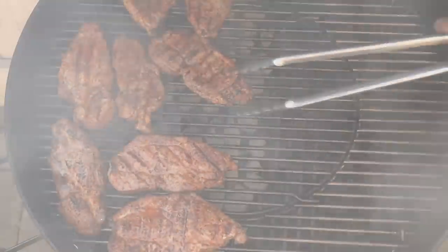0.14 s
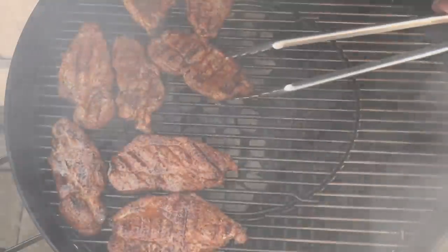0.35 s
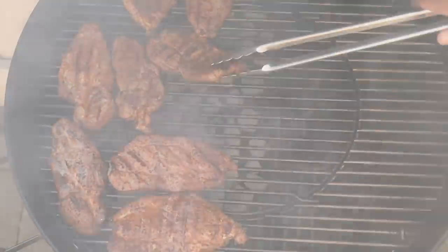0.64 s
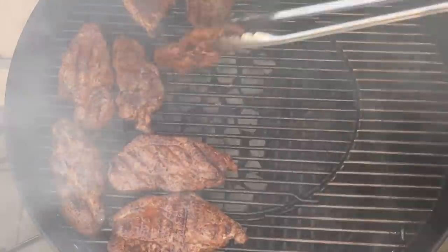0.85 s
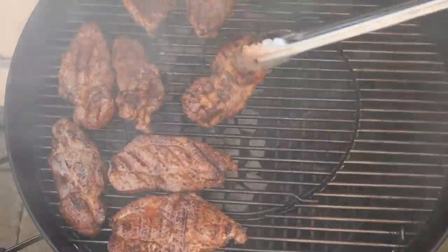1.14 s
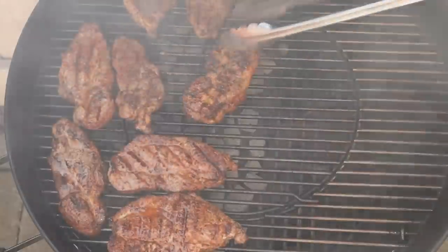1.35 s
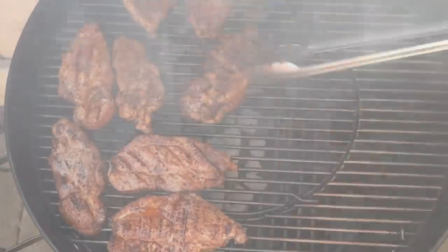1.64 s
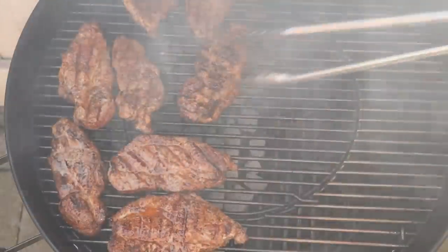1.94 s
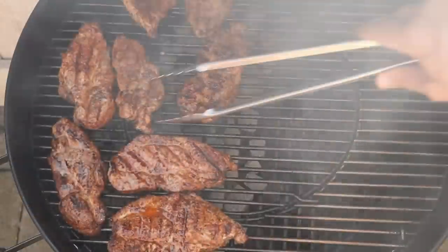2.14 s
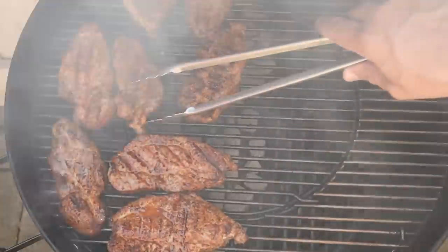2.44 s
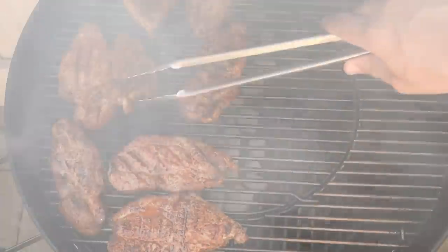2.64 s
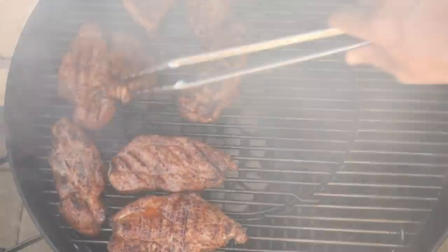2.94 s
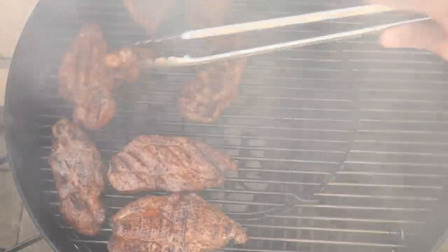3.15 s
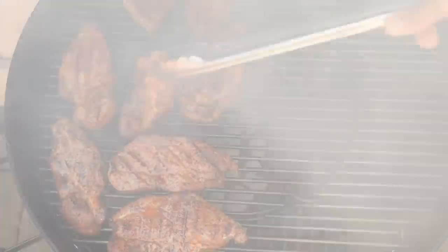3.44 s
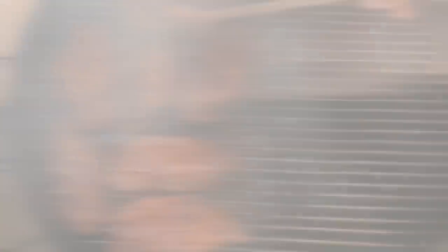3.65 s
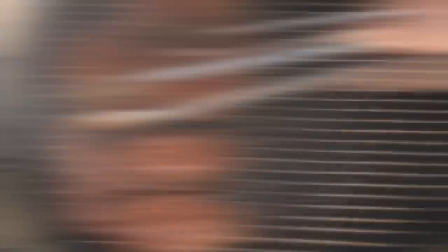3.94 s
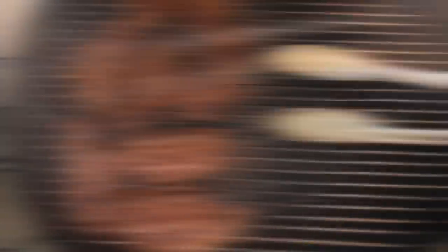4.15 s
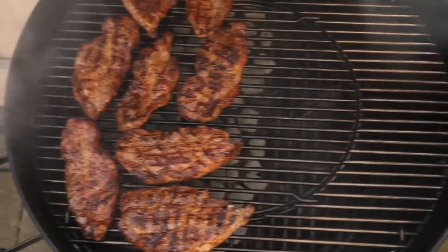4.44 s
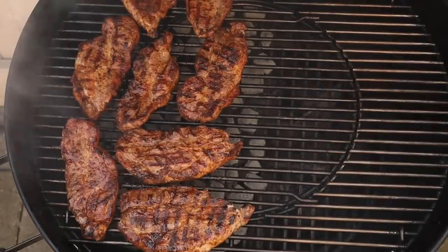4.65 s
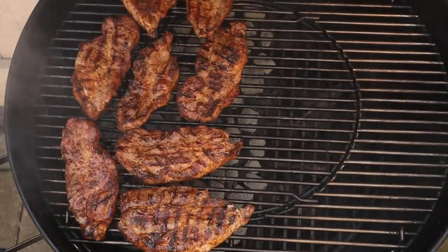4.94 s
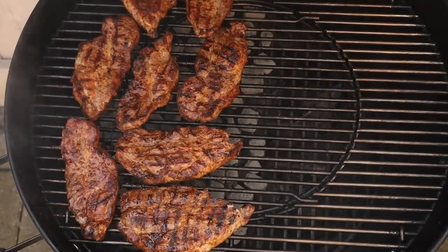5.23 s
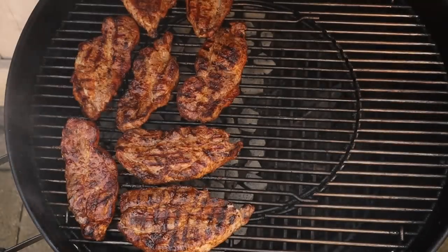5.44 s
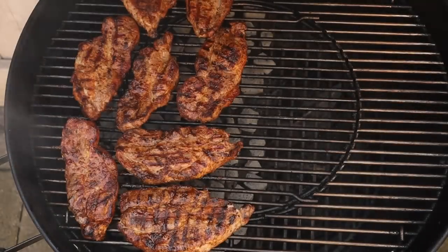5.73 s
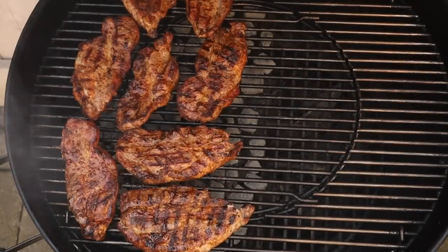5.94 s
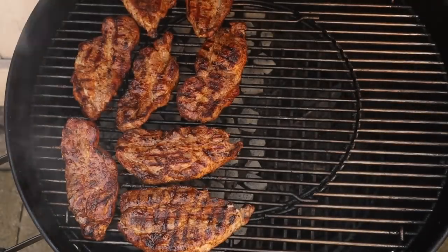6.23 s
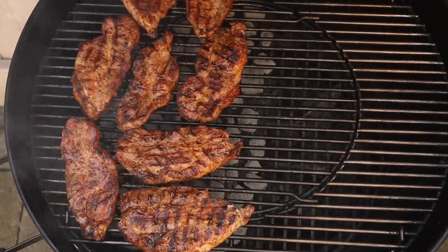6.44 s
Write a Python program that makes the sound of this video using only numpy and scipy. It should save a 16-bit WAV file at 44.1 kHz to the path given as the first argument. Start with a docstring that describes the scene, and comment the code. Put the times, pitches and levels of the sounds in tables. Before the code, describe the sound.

Pork sizzles on a charcoal grill throughout, a bright, dense hiss full of tiny crackles, heard from just above the grate with a faint low outdoor rumble beneath. Tongs softly bump the grate at the very start, and meat rubs faintly on the bars. At about 1.2 seconds juice spits and the sizzle flares, swelling again around 1.8, 2.9 and 3.6 seconds, the last with a sharper spit. Single pops of fat are scattered between 0.6 and 4.3 seconds. At 2.4 seconds the tongs give a short, lightly ringing metal scrape. Around 4 seconds the tone shifts slightly as the microphone moves, and the sizzle slowly eases. At about 5.2 seconds the tongs slide on a wooden board, then land with a few hollow, rattling knocks from 5.35 to 5.8 seconds, the first the loudest. The sizzle continues to the end, around 6.5 seconds.

```python
"""Pork sizzles on a charcoal kettle grill in a quiet garden, heard from just above the grate.
From the start, countless tiny steam bursts echo in the steel bowl; tongs bump the grate and drag meat.
Then the sizzle flares as pieces are turned or pressed and fat hits the coals, fading as the meat dries.
Near 4 s the microphone moves and the tone changes. Last, just after 5 s, the tongs are slid aside
and put down on a wooden board with a few hollow knocks."""
import sys
import numpy as np
from scipy import signal
from scipy.fft import rfft, irfft
from scipy.io import wavfile
from scipy.ndimage import uniform_filter1d

SR = 44100
rng = np.random.default_rng(int(sys.argv[2]) if len(sys.argv) > 2 else 0)


def dump_mix(stems):
    """Bounce the given channels to the path in sys.argv[1] as a 16-bit WAV at rate SR."""
    frames = np.atleast_2d(stems).T  # one column per channel
    limited = np.clip(frames, -1, 1)  # hard clip at full scale
    pcm = np.round(limited * 32767).astype(np.int16)
    wavfile.write(sys.argv[1], SR, pcm)


N = 290619
TIME = np.arange(N) / SR
# the tongs hit the board:
# (time [s], level [dB], extra clack [dB], extra thud [dB], pitch [factor], wait until the bounce [s])
KNOCKS = [(5.353, -19.5, -1.5, -26, 0.96, 0.029), (5.428, -27, 2, -15, 0.93, 0.033),
          (5.633, -25.5, -5.5, -27, 0.98, 0.026), (5.7038, -31.5, -11, -32.5, 0.9, 0.025),
          (5.729, -36.5, 0, -7, 1.2, 0.014), (5.754, -31, -12, -18, 1.02, 0.033)]


def undb(db):
    """Turn decibels into a gain to multiply by."""
    return 10 ** (np.asarray(db) / 20)

def unit(x):
    """Scale x to an average (rms) level of 1."""
    return x / np.sqrt(np.mean(x ** 2))

def steady(x):
    """Keep the average level near 1 over each half second."""
    return x / np.sqrt(uniform_filter1d(x ** 2, size=SR // 2))

def add(out, s, sound):
    """Mix a short sound in at time s."""
    i = int(s * SR)
    out[i:i + len(sound)] += sound[:N - i]

def envelope(s, rise_s, hold_s, decay_s):
    """A level that rises from time s, holds, then dies away."""
    rise = np.clip((TIME - s) / rise_s, 0, 1)
    return rise * np.exp(-np.maximum(TIME - s - rise_s - hold_s, 0) / decay_s)

def swell(s, half_length_s):
    """A smooth rise and fall around time s."""
    return np.exp(-((TIME - s) / half_length_s) ** 2)

def freqs(x):
    """The frequencies in the spectrum of x, in Hz."""
    return np.maximum(np.fft.rfftfreq(len(x), 1 / SR), 1)

def colour(x, points):
    """Shape the tone of x along (frequency [Hz], level [dB]) points."""
    hz, db = np.transpose(points)
    gain = undb(np.interp(np.log(freqs(x)), np.log(hz), db))
    return irfft(rfft(x) * gain, len(x))

def below(x, hz):
    """The part of x lower than hz."""
    return irfft(rfft(x) / (1 + (freqs(x) / hz) ** 6), len(x))

def resonate(x, hz, width_hz):
    """Let x ring around one pitch; a narrow width rings longer."""
    hz = min(hz, SR / 3)
    return signal.lfilter(*signal.iirpeak(hz, hz / width_hz, fs=SR), x)

def band(x, hz, width_hz):
    """The part of x close to hz, at level 1."""
    return unit(resonate(resonate(x, hz, width_hz), hz, width_hz))

def bands(x, rows):
    """Mix several bands of x, each at its own level."""
    return sum(undb(db) * band(x, hz, width_hz) for hz, width_hz, db in rows)

def cavity(x, rows):
    """The air in a hollow rings along with x at its own pitches."""
    return sum(undb(db) * resonate(x, hz, width_hz) for hz, width_hz, db in rows)

def echo(x, delay_ms, dull_hz):
    """Sound bounces off a curved wall, which scatters the treble."""
    f = freqs(x)
    return irfft(rfft(x) * np.exp(-2j * np.pi * f * delay_ms / 1000 - (f / dull_hz) ** 2), len(x))

def wander(per_s):
    """A smooth random drift, about 1 in size."""
    step = int(SR / per_s)
    stairs = np.repeat(rng.standard_normal(N // step + 1), step)
    return unit(uniform_filter1d(uniform_filter1d(stairs, step), step))[:N]

def grains(per_s, spread_db):
    """Tiny random clicks, most weak and a few strong."""
    size = undb(spread_db * np.minimum(rng.exponential(size=N), 6))
    return unit((rng.random(N) < per_s / SR) * size * rng.choice([-1, 1], N))

def garden():
    """Low outdoor rumble with a wavering distant drone in it."""
    # tone of the rumble: (frequency [Hz], level [dB])
    rumble_tone = [(20, -28), (50, -14), (68, -2), (90, -2), (130, -2.5), (190, -9), (400, -16),
                   (1500, -44)]
    # its slow rise and fall: (time [s], relative level [dB])
    rumble_level = [(0, -60), (.7, -63), (2.4, -65.5), (3.4, -61), (4, -61), (4.3, -66), (6.55, -64)]
    db = np.interp(TIME, *np.transpose(rumble_level))
    drone = undb(-7.5) * band(rng.standard_normal(N), hz=70.4, width_hz=7.7)
    rumble = unit(colour(rng.standard_normal(N), rumble_tone))
    return (rumble + drone) * undb(db - 1.5 + 0.4 * wander(per_s=5))

def grate_nudges():
    """A light bump of the tongs and meat rubbing on the grate make the bowl hum briefly."""
    # what rings after the bump: (pitch [Hz], width [Hz], level [dB])
    bump_ring = [(576, 90, 0), (745, 150, -7)]
    # the bowl's hum under the rubbing: (pitch [Hz], width [Hz], level [dB])
    rub_hum = [(235, 126, -0.5), (800, 71, -5)]
    # meat is dragged: (time [s], level [dB], half length [s])
    rubs = [(0.254, -58.5, 0.16), (1.15, -59, 0.15)]
    bump = undb(-50) * bands(rng.standard_normal(N), bump_ring)
    bump *= envelope(0.082, rise_s=0.015, hold_s=0.022, decay_s=0.028)
    rubbing = sum(undb(db) * swell(s, half_length_s) for s, db, half_length_s in rubs)
    return bump + rubbing * bands(rng.standard_normal(N), rub_hum)

def grate_scrape():
    """The tongs stick and slip along the bars: a short rasp, and the steel rings on."""
    # the rasp: (pitch [Hz], width [Hz], level [dB])
    rasp_tone = [(2760, 960, -1.5), (3430, 2900, -1), (1230, 650, -5)]
    # the ringing steel: (pitch [Hz], width [Hz], level [dB])
    steel_tone = [(2540, 70, -9), (2750, 100, -7), (3030, 100, -14.5), (3340, 180, -10.5)]
    start_s, rise_s, hold_s = 2.408, 0.014, 0.045
    slips = grains(per_s=4000, spread_db=3.0)
    rasp = bands(slips, rasp_tone) * envelope(start_s, rise_s, hold_s, decay_s=0.025)
    ring = bands(slips, steel_tone) * envelope(start_s, rise_s, hold_s, decay_s=0.13)
    return undb(-44.3) * (rasp + ring)

def board_slide():
    """The tongs stick and slip on the board: a push, then a duller drag until the first knock."""
    # tone of steel sliding on wood: (frequency [Hz], level [dB])
    slide_tone = [(120, -19), (240, -4.5), (450, -15.5), (680, -8), (790, 1.5), (880, -7), (1030, -2),
                  (1300, -23), (1750, -5.5), (2120, -0.5), (2400, -15), (2800, -13), (4500, -40)]
    push_s, first_knock_s = 5.175, KNOCKS[0][0]
    push = undb(-45.5) * swell(push_s, half_length_s=0.067)
    drag = undb(-46.5) * (TIME > push_s) * (TIME < first_knock_s)
    rub = unit(colour(grains(per_s=2500, spread_db=1.5), slide_tone))
    dull = below(rub, hz=1500)
    return dull * np.hypot(push, drag) + (rub - dull) * push

def blows():
    """Each knock is followed by a weaker bounce that rings higher, with less clack and more thud."""
    for s, db, clack_db, thud_db, pitch, wait_s in KNOCKS:
        yield s, db, clack_db, thud_db, pitch
        loss_db = 7 + 0.45 * (db + 30)  # harder blows lose more
        yield s + wait_s, db - loss_db, clack_db - 8, thud_db + 4.5, pitch * 1.2

def board_knocks():
    """The tongs land and rattle: each blow rings the board, thuds into its support and clacks."""
    # the board's own notes: (pitch [Hz], level [dB], time to fade by 60 dB [s])
    board_notes = [(243, -27, 0.2), (346.3, -14, 0.27), (406, 5, 0.041), (473, -8.5, 0.053),
                   (547, -21, 0.095), (655, -18, 0.1), (767, -17, 0.11), (872, -13, 0.07),
                   (1020, -21, 0.044), (1570, -23, .08), (1910, -30, 0.038), (2080, -11.5, 0.05)]
    # tone of the clack: (frequency [Hz], level [dB])
    clack_tone = [(100, -34), (300, -1), (850, 0.5), (1300, -1.5), (1900, -1.5), (2600, -5), (3600, -8.5),
                  (4300, -16.5), (7000, -22), (14000, -44)]
    contact_s, thud_s, clack_s, scatter_s = 0.003, 0.02, 0.0088, 0.042
    out, t = np.zeros(N), TIME[:SR // 3]
    for s, db, clack_db, thud_db, pitch in blows():
        tunings = pitch * (1 + 0.022 * rng.standard_normal(len(board_notes)))
        ring = sum(undb(note_db) * np.sin(2 * np.pi * hz * tuning * t) * undb(-60 * t / fade_s)
                   for (hz, note_db, fade_s), tuning in zip(board_notes, tunings))
        thud = band(rng.standard_normal(len(t)), hz=158, width_hz=158) * np.exp(-t / thud_s)
        wood = (ring + undb(thud_db) * thud) * (1 - np.exp(-t / contact_s))
        scatter = undb(-10) * np.exp(-t / scatter_s)  # the clack comes back off things nearby
        clack = unit(colour(rng.standard_normal(len(t)), clack_tone)) * (np.exp(-t / clack_s) + scatter)
        add(out, s, undb(db) * (wood + undb(clack_db - 9.5) * clack))
    return out

def fat_pops():
    """Larger bubbles of fat crack one at a time; the lower ones last longer."""
    # single bubbles: (time [s], peak level [dB], pitch [Hz])
    pops = [(.5781, -32.5, 8000), (.779, -33, 8000), (2.3003, -29.5, 1444), (2.461, -28, 3000),
            (3.4113, -29.5, 7000), (3.416, -30, 2320), (3.845, -27, 8000), (4.0243, -29.5, 2100),
            (4.3222, -29, 5000)]
    decay_cycles = 3
    out, t = np.zeros(N), TIME[:SR // 20]
    for s, db, hz in pops:
        burst = rng.standard_normal(len(t)) * np.exp(-t * hz / decay_cycles)
        pop = resonate(burst, hz, width_hz=0.83 * hz)
        add(out, s, undb(db) * pop / np.abs(pop).max())
    return out

def frying(crackle_db, base_per_s, spread_db, flicker_db):
    """Steam hisses and fat bubbles of five sizes burst; the small, high ones burst more often."""
    bursts = 0
    for hz in np.geomspace(1500, 12000, num=5):
        clicks = grains(base_per_s * np.sqrt(hz / 5000), spread_db)
        bursts += resonate(clicks, hz, width_hz=0.73 * hz) * undb(flicker_db * wander(per_s=35))
    return unit(rng.standard_normal(N) + undb(crackle_db) * unit(bursts))

def spits():
    """A drop meets hot metal or coals and boils away in a jet; a bigger one is lower and longer."""
    # drops of juice and fat: (time [s], level [dB], size [factor])
    drops = [(1.224, -45, 0.93), (1.783, -48.5, 3.7), (3.553, -34, 1), (4.011, -53, 9.2)]
    # the steam jet of a size 1 drop: (pitch [Hz], width [Hz], level [dB])
    jet_tone = [(10050, 6000, -1.5), (7520, 290, -11), (5200, 5400, -7.5)]
    out = np.zeros(N)
    steam = frying(crackle_db=-7, base_per_s=1600, spread_db=4.0, flicker_db=0)
    for s, db, size in drops:
        tone = [(hz / size, width_hz / size, band_db) for hz, width_hz, band_db in jet_tone]
        stretch = np.sqrt(size)
        shape = envelope(s, rise_s=0.013, hold_s=0.013 * stretch, decay_s=0.052 * stretch)
        out += undb(db) * unit(bands(steam, tone)) * shape
    return out

def heat(mic_moved):
    """Drying meat fades and wet meat flares: each band's gain, and the flares' share of its power."""
    # the sizzle's low murmur, middle frying and high hiss: (starting level [dB], fall [dB/s],
    # added to each flare [dB], flare rise [s], change as the microphone moves [dB])
    sizzle_bands = [(-58, 0.85, -17, 0.11, -0.1), (-50.5, 0.64, -5.3, 0.13, 0.5),
                    (-47, 0.5, 0.06, 0.039, -1.0)]
    # wet meat or juice meets the heat: (time [s], level [dB], decay [s], extra murmur and frying [dB])
    flares = [(1.232, -43, 2.8, -1), (1.76, -49, 1, 1), (2.42, -55.5, 2.9, 9.5), (2.86, -48, 1.4, 0),
              (3.56, -45, 1.7, -1.5), (3.99, -51, 2.4, 6)]
    gains, shares = [], []
    for (base_db, fall_db, flare_db, rise_s, move_db), is_low in zip(sizzle_bands, (True, True, False)):
        flare_power = sum((undb(db + flare_db + is_low * extra_db) * envelope(s, rise_s, 0, decay_s)) ** 2
                          for s, db, decay_s, extra_db in flares)
        power = undb(base_db - fall_db * TIME) ** 2 + flare_power
        gains.append(np.sqrt(power) * undb(move_db * mic_moved))
        shares.append(flare_power / power)
    return gains, shares

def sizzle():
    """The meat fries; the bowl throws the sound back up and the hollows around the meat colour it."""
    # tone of the sizzle: (frequency [Hz], level [dB])
    sizzle_tone = [(100, -5.5), (220, 0), (550, -0.5), (900, -2), (1400, -2), (2150, -3.5), (3300, -1.9),
                   (5400, -2), (7000, -1), (10000, 1), (12500, 0.4), (15500, -5)]
    # ringing air in four places: (pitch [Hz], width [Hz], level [dB])
    bowl_air = [(339, 92, -3), (580, 67, 1.5), (861, 14, -2)]  # inside the bowl
    grate_air = [(2510, 420, -0.5)]  # over the grate
    turned_air = [(1276, 200, 0), (2400, 150, -4.5), (3670, 290, -5), (4710, 190, -0.5), (5910, 130, -2.5)]  # around the turned meat
    moved_air = [(830, 50, -10), (1340, 80, -11), (1850, 110, -1.5), (2820, 180, -4), (3800, 240, -7),
                 (5170, 930, -10)]  # where the microphone ends up
    move_start_s, move_length_s = 3.77, 0.8
    mic_moved = np.clip((TIME - move_start_s) / move_length_s, 0, 1)
    (murmur, fry, hiss), (_, flare_share, _) = heat(mic_moved)
    turned = 1.1 * np.sqrt(flare_share) * (1 - mic_moved) ** 2
    meat = colour(frying(crackle_db=-2.5, base_per_s=1800, spread_db=2.4, flicker_db=1.8), sizzle_tone)
    bowl = meat + 0.37 * echo(meat, delay_ms=3.6, dull_hz=1280)
    bowl += (1 - 0.36 * mic_moved) * cavity(meat, bowl_air)
    heard = bowl + turned * cavity(bowl, turned_air)
    heard += (1 - mic_moved) * cavity(bowl, grate_air) + mic_moved * cavity(bowl, moved_air)
    low, low_and_mid = below(heard, hz=1114), below(heard, hz=5000)
    return murmur * steady(low) + fry * steady(low_and_mid - low) + hiss * steady(heard - low_and_mid)

def scene():
    """Tongs, grill and garden together, the same in the left and right channels."""
    tongs = board_slide() + board_knocks()
    grill = sizzle() + spits() + fat_pops() + grate_scrape() + grate_nudges()
    return np.tile(grill + tongs + garden(), (2, 1))

def record(dry):
    """Cut away the very highest treble."""
    top_hz = 15750
    return signal.sosfilt(signal.ellip(12, .1, 80, top_hz, fs=SR, output="sos"), dry)


dry = scene()
out = record(dry)
dump_mix(out)
```